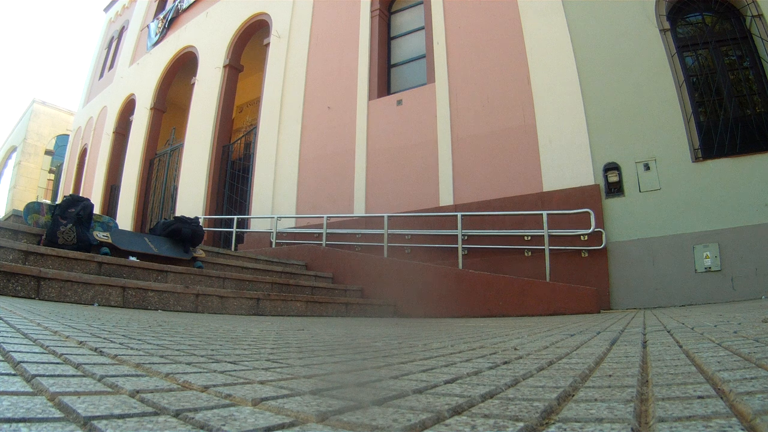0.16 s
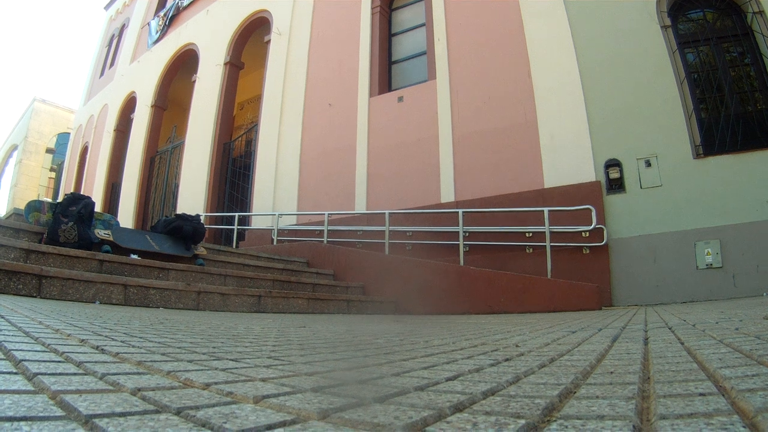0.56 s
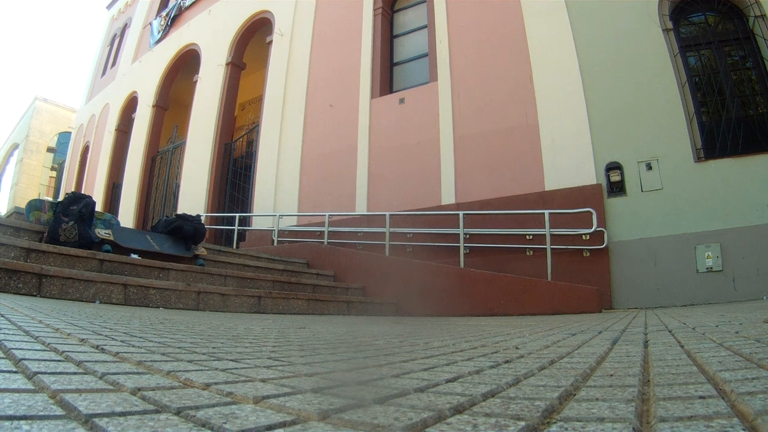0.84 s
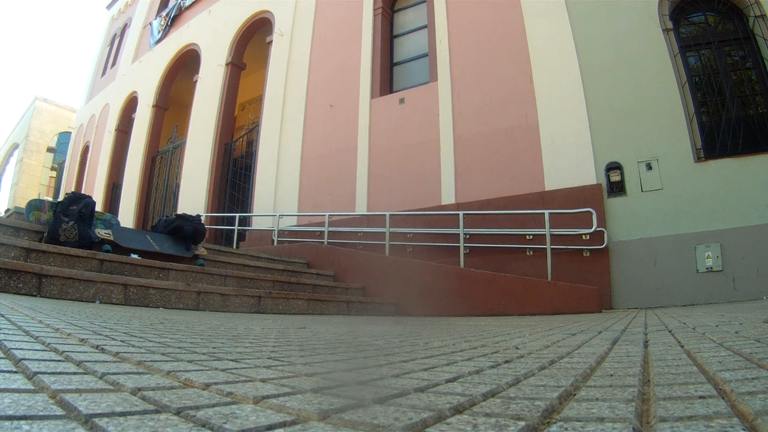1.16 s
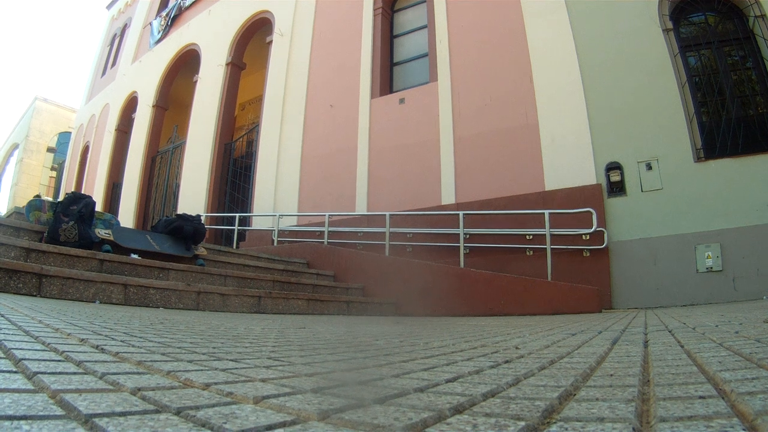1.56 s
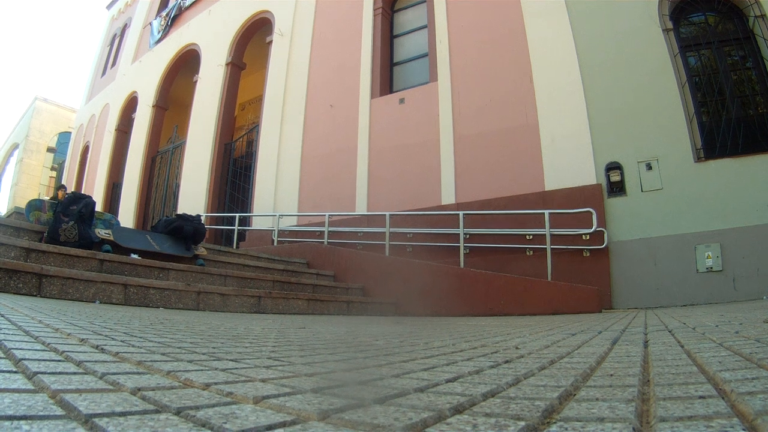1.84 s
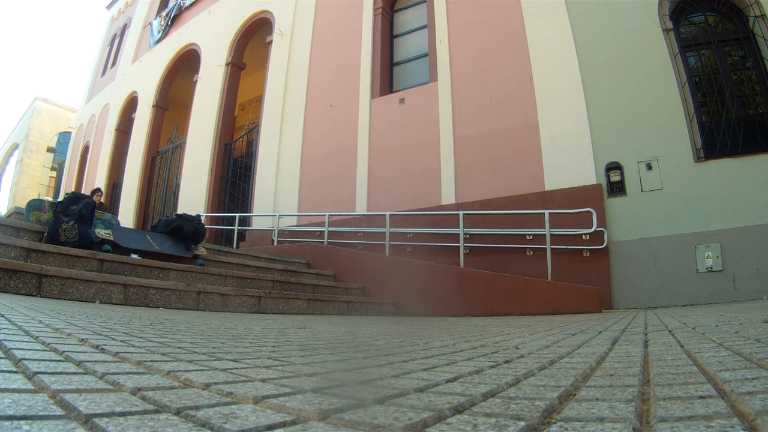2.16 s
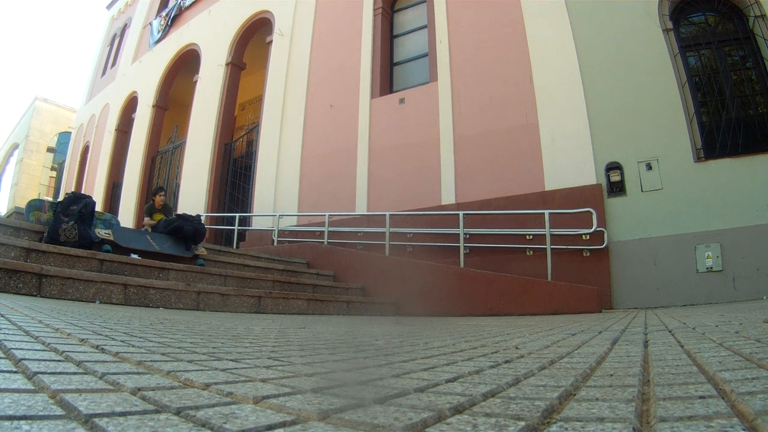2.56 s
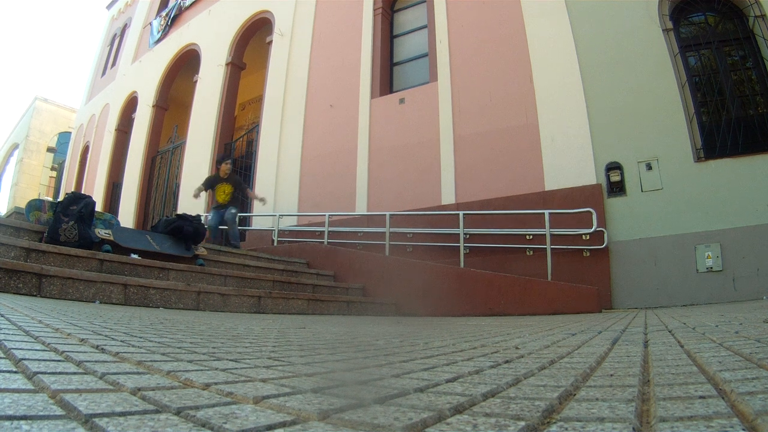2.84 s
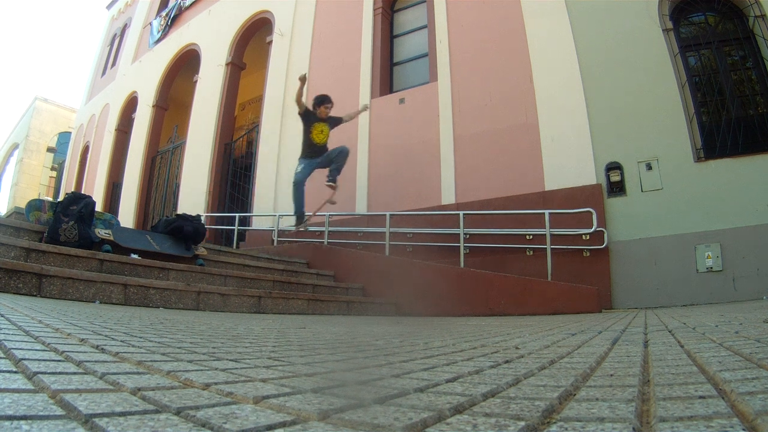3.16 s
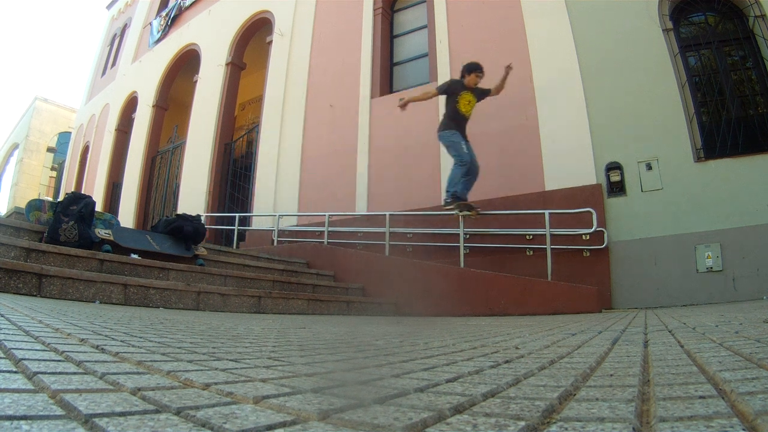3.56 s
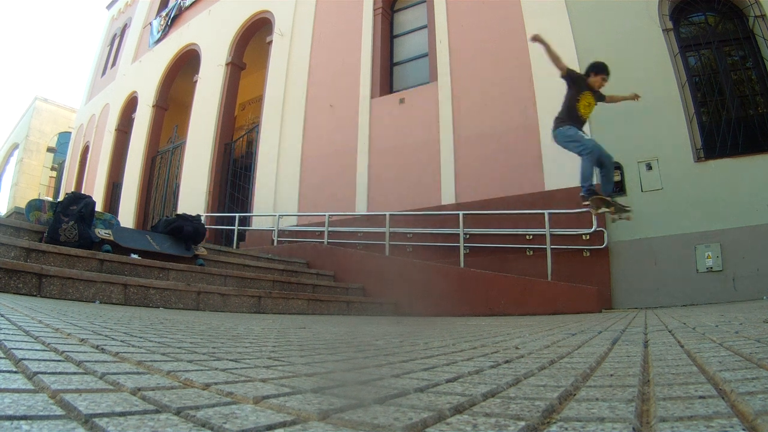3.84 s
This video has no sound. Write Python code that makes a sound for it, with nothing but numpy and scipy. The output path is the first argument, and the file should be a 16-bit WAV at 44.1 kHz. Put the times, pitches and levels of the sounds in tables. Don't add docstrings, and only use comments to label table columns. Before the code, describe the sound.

Skateboard outdoors over faint traffic wash. Loud close plastic clicks at about 0.26 and 0.32 s, then quiet. At 1.18 s the board drops with a wooden knock and short tail scrape. From 1.5 s wheels rumble and knock over paving joints, strongest near 3.1 s. A pop at 3.2 s, a clipped steel clang at 3.45 s, ringing scrape, and two taps near 3.95 s with wall echo.

```python
import sys
import numpy as np
from scipy import signal
from scipy.fft import rfft, irfft
from scipy.io import wavfile
from scipy.ndimage import uniform_filter1d

SR = 44100
rng = np.random.default_rng(int(sys.argv[2]) if len(sys.argv) > 2 else 0)


def pcm_store(signal):
    levels = np.round(np.clip(np.atleast_2d(signal), -1, 1) * 32767)
    wavfile.write(sys.argv[1], SR, levels.astype(np.int16).T)


def voltage_ratio(decibels):
    exponent = np.asarray(decibels, float) / 20
    return 10 ** exponent


N = 176400
T = np.arange(N) / SR


def evened(x):
    return x / np.sqrt(np.mean(x ** 2) + 1e-20)


def noise():
    return rng.standard_normal(N)


def read(points, hz):
    f, value = np.transpose(points)
    return np.interp(np.log(hz + 1), np.log(f + 1), value)


def coloured(x, points):
    gain = voltage_ratio(read(points, np.fft.rfftfreq(len(x), 1 / SR)))
    return evened(irfft(rfft(x) * gain, len(x)))


def resonate(x, hz, width_hz):
    return signal.lfilter(*signal.iirpeak(hz, hz / max(width_hz, .5), SR), x)


def curve(points, column=1):
    rows = np.transpose(points)
    return voltage_ratio(np.interp(T, rows[0], rows[column], -120, -120))


def lumps(size):
    return evened(uniform_filter1d(uniform_filter1d(noise(), size), size))


def pulse(u):
    return u * np.exp(1 - u)


def dying(points, t60s, start_s):
    hz, t, z = signal.stft(coloured(noise(), points), SR, nperseg=256)
    t60 = np.maximum(read(t60s, hz), .05)[:, None]
    z = z * voltage_ratio(-60 * np.maximum(t - start_s, 0) / t60)
    return signal.istft(z, SR, nperseg=256)[1][:N] * np.clip((T - start_s) / 0.009, 0, 1)


def grit(per_s, spread_db):
    hits = rng.random(N) < per_s / SR
    size = voltage_ratio(spread_db * np.minimum(rng.exponential(1, N), 4))
    return hits * size * rng.choice([-1., 1.], N)


# frequency in Hz, level in dB.
AIR_COLOUR = [(12, -40), (20, -8.5), (54, -1.5), (301, -12.5), (452, -14), (497, -12.5), (587, -16),
              (2890, -29.5), (5300, -34.5), (6000, -47), (7670, -100), (13000, -120)]


def air():
    return voltage_ratio(-35.5 + 0.54 * lumps(size=2500)) * coloured(noise(), AIR_COLOUR)


CLICK_S = [.2553, .2556, .2566, .257, .2562, .2562, .2558, .2625, .2635, .2635, .3176, .3184, .3178, .3178,
           .3176, .318, .535, .2635, .2635, .3232, .3232, .3235, .3190]
# frequency in Hz, level in dB, rise in seconds.
CLICK_PARTS = [(770, -4, 0.0007), (1450, -12, 0.00044), (3070, -16.5, 0.00073), (3730, -7.5, 0.0005),
               (2330, -14.5, 0.00086), (4600, -22, 0.0015), (5430, -17, 0.0005), (228, -18.5, 0.0017),
               (3000, -25.5, 0.00075), (4200, -22, 0.00066), (447, -8, 0.0012), (2326, 3, 0.0011),
               (3693, 2.5, 0.0013), (4630, 0, 0.00085), (1100, -2, 0.0013), (1625, -12.5, 0.0019),
               (1900, -34, 0.0015), (1900, -24, .0006), (5200, -27, .0006), (2480, -14, .0007),
               (3600, -20, .0007), (800, -15, 0.0012), (3450, -33, 0.00049)]


def clicks():
    out = np.zeros(N)
    for s, (hz, db, rise_s) in zip(CLICK_S, CLICK_PARTS):
        t = np.maximum(T - s, 0)
        out -= voltage_ratio(db) * pulse(t / rise_s) ** 2 * np.sin(2 * np.pi * hz * t)
    return out


# time in seconds, level in dB.
DRAG_LEVEL = [
    (1.2, -43),
    (1.225, -35.5),
    (1.25, -29.5),
    (1.3, -31.5),
    (1.35, -35.5),
    (1.41, -39.5),
    (1.48, -47.5),
]
# frequency in Hz, level in dB.
DRAG_COLOUR = [(120, -38), (200, -7), (269, -17), (474, 2), (1410, -7.5), (2300, -9.5), (4400, -15.5),
               (5900, -31.5), (7670, -64), (13000, -120)]


def drag():
    slips = noise() + 0.16 * evened(grit(per_s=1400, spread_db=2.7))
    return curve(DRAG_LEVEL) * voltage_ratio(2.0 * lumps(size=250)) * coloured(slips, DRAG_COLOUR)


# frequency in Hz, width in Hz, level in dB.
DECK_MODES = [(129.6, 33, -2), (178.8, 63, 2), (230, 79, 1.5), (452.6, 96, 1.5), (522.5, 75, 0),
              (609.6, 35.4, 0), (681.6, 56, -3.5), (776.6, 40, -5.5), (864, 24, -17), (1090, 86, -51)]


def deck(drive, weight, bright, sway):
    sway_db, modes = 1.5, []
    for k, (hz, width_hz, db) in enumerate(DECK_MODES):
        ring = evened(resonate(resonate(drive, hz, 1.39 * width_hz), hz, 1.38 * width_hz))
        modes.append(voltage_ratio(db + sway_db * np.roll(sway, k * N // len(DECK_MODES))) * ring)
    low, middle, top = sum(modes[:3]), sum(modes[3:7]), sum(modes[7:])
    return (middle + bright * top) / np.std(middle) + weight * evened(low)


# time in
# seconds, thud in dB, pitch in Hz, rattle in dB.
JOINTS = [(1.179, -15, 515, -37), (1.548, -10, 800, -45), (1.30, -32, 696, -34), (3.066, -15.5, 816, -49),
          (1.249, -28, 880, -32), (1.439, -20.5, 510, -57), (2.783, -9.5, 153, -57), (2.402, -10, 555, -53),
          (3.085, -6.5, 193, -38), (3.165, -18, 250, -44), (3.205, -12, 276, -28.5),
          (3.113, -12.5, 800, -52), (1.354, -13, 496, -50), (1.501, -6.5, 532, -38), (1.541, -4, 578, -40),
          (1.852, -6.5, 606, -41), (1.895, -16, 647, -51), (1.93, -8.5, 588, -46), (1.944, -6.5, 610, -56),
          (1.989, -8, 563, -59), (1.695, -14, 566, -53), (2.15, -11.5, 600, -47), (2.61, -8, 702, -53),
          (2.022, -8.5, 603, -64), (2.251, -4, 462, -52), (2.348, -10.5, 588, -35.5),
          (2.429, -8.5, 598, -52), (2.444, -7.5, 630, -36.5), (2.55, -9.5, 535, -39),
          (2.668, -19, 533, -47), (2.769, -21, 606, -33), (2.865, -12, 650, -33.5), (2.984, -7.5, 540, -35),
          (3.014, -18, 667, -38), (3.063, -12, 620, -47), (3.077, -10, 637, -36.5), (3.099, -12, 650, -44)]


def joints(rattle):
    trim_db, rise_s, rattle_s, size = -7.5, 0.0051, 0.018, 3000
    out, t = np.zeros(N), np.arange(size) / SR
    for s, thud_db, hz, rattle_db in JOINTS:
        at, u = round(s * SR), t / rise_s
        phase = 2 * np.pi * hz * t
        rock = np.sin(phase) + 0.24 * np.sin(0.408 * phase) + 0.2 * np.sin(1.45 * phase)
        shaken = np.minimum(u * 3, 1) * np.exp(-t / rattle_s) * rattle[at:at + size]
        out[at:at + size] += voltage_ratio(thud_db + trim_db) * pulse(u) ** 1.16 * rock + voltage_ratio(rattle_db) * shaken
    return out


# time in seconds, level in dB, weight of low deck modes in dB.
ROLL = [(1.49, -54, 10), (1.5, -23, -2), (1.65, -21, -9.5), (1.79, -25, -2), (1.9, -24, -5),
        (2.05, -26, -6), (2.13, -24.5, -6.5), (2.2, -24.5, -10), (2.45, -22, -4), (2.62, -21.5, -3),
        (2.78, -20.5, -3), (2.82, -22.5, -3), (3.05, -19.5, -1.5), (3.09, -16.5, -1), (3.13, -25, 1),
        (3.2, -24, 0.5), (3.24, -27, -4), (3.36, -50.5, 12)]
# frequency in Hz, level in dB.
RATTLE_COLOUR = [(530, -5.5), (900, -2), (1250, -28), (2140, -7.5), (2330, -18), (3050, -15), (5900, -23),
                 (7670, -67), (13000, -120)]


def rolling():
    smooth_share, lump_db = .62, 1.2
    lump = lumps(size=350)
    sway = evened(uniform_filter1d(lump, size=1500))
    bumps = evened(grit(per_s=900, spread_db=1.6))
    drive = ((1 - smooth_share) * bumps + smooth_share * noise()) * voltage_ratio(lump_db * lump)
    level = curve(ROLL)
    bright = np.minimum(level / voltage_ratio(-17.5), 2) ** 0.83
    wood = deck(drive, curve(ROLL, column=2), bright, sway)
    rattle = coloured(noise(), RATTLE_COLOUR)
    return level * (wood + voltage_ratio(-22 + 2.0 * lumps(size=300)) * rattle) + joints(rattle)


KNOCK_S = [1.1795, 3.216, 3.9533, 3.96]
# level in dB, burst in seconds, echo in dB.
KNOCKS = [
    (-23, 0.027, -18),
    (-16.5, 0.016, -12),
    (-16.5, 0.0059, -7.5),
    (-18.5, 0.0073, -19),
]
# frequency in Hz, level in dB.
KNOCK_COLOURS = [
    [(88, -46), (150, -29), (545, 1), (1270, -12.5), (1920, -12), (2240, -12.5), (4690, -22.5), (5900, -35),
     (7670, -70), (13000, -120)],
    [(88, -31), (150, -17), (482, -8), (741, -1), (1310, -11), (3500, -15.5), (4760, -17.5), (5900, -31),
     (7670, -66), (13000, -120)],
    [(88, -24), (150, 8.5), (1530, -1.5), (1920, 1), (2210, -0.5), (2650, -5), (4830, -8.5), (5900, -33),
     (7670, -69), (13000, -120)],
]
# frequency in Hz, t60 in seconds.
ECHO_T60 = [(200, 1), (1000, 0.68), (3000, .55), (5500, 0.39)]


def knocks():
    out, echo_lag_s = np.zeros(N), 0.024
    for s, (db, burst_s, echo_db), colour in zip(KNOCK_S, KNOCKS, KNOCK_COLOURS + KNOCK_COLOURS[-1:]):
        u = np.maximum(T - s, 0) / burst_s
        chatter = coloured(noise() + 0.5 * evened(grit(per_s=3700, spread_db=7.1)), colour)
        burst = np.minimum(u * 10, 1) * np.exp(-u ** 2.5) * chatter
        bounce = 0.21 * np.roll(burst, 60)
        swell = np.clip((T - s) / echo_lag_s, .35, 1)
        out += voltage_ratio(db) * (burst + bounce + voltage_ratio(echo_db) * swell * dying(colour, ECHO_T60, s))
    return out


# lag in seconds, frequency in Hz, level in dB, rise in seconds.
SLAM = [(.0012, 470, -5, 0.0022), (.0012, 770, -7, 0.0022), (0.00356, 910, -13.5, 0.0029),
        (0.00295, 1330, -23, .0015), (.001, 3085, -13, 0.0018), (0.00053, 3600, -13, .0016),
        (0.001, 4700, -13, 0.0017), (.0007, 5200, -14.5, .0017), (0.0072, 1600, -5, .0015),
        (0.00083, 2440, -13.5, 0.0013)]


def slam(t):
    out = np.zeros(N)
    for lag_s, hz, db, rise_s in SLAM:
        since = np.maximum(t - lag_s, 0)
        out += voltage_ratio(db) * pulse(since / rise_s) ** 2 * np.sin(2 * np.pi * hz * since)
    return out


RAIL_HZ = [114, 198, 226, 842, 987, 2104, 2780, 2825, 2947, 3122, 3408, 3770, 4100, 1351]
# level in dB, t60 in seconds.
RAIL_MODES = [(-3, 6.1), (-10, 2.8), (-2, 1.2), (-3.5, 1.3), (-5, 0.6), (-10, 1.1), (-19.5, 2.2),
              (-18, 2.1), (-3, 0.43), (-7, 0.4), (-24, 0.41), (-8.5, 0.6), (-1.5, 0.4), (-4, 0.7)]
# frequency in Hz, width in Hz, level in dB, t60 in seconds.
SHIMMER = [(2840, 260, -33, 0.97), (3130, 240, -33, 0.35), (3440, 180, -29, 0.34), (4100, 250, -35, .4)]


def rail_modes(t):
    waver_db, waver_hz, ring_db, sing_db = 4.0, 9, -28, -26.5
    shake, out = noise() * voltage_ratio(0.64 * lumps(size=300)), np.zeros(N)
    for hz, (db, t60) in zip(RAIL_HZ, RAIL_MODES):
        sing = evened(resonate(shake, hz, 22 + 0.006 * hz))
        cycles = hz * t + waver_hz * np.cumsum(lumps(size=700)) / SR + rng.random()
        ring = voltage_ratio(waver_db * lumps(size=900)) * np.sin(2 * np.pi * cycles)
        out += voltage_ratio(db - 60 * t / t60) * (voltage_ratio(ring_db) * ring + voltage_ratio(sing_db) * sing)
    for hz, width_hz, db, t60 in SHIMMER:
        out += voltage_ratio(db - 60 * t / t60) * evened(resonate(resonate(shake, hz, width_hz), hz, width_hz))
    return out


# frequency in Hz, level in dB.
CRACK_COLOUR = [(88, -45), (150, -38), (545, 1), (1160, -5), (2690, -14), (3090, -11), (5300, -11),
                (5900, -53), (7670, -69), (13000, -120)]
# frequency in Hz, level in dB.
SLIDE_COLOUR = [(35, -56), (60, -29), (113, -19), (230, -57), (394, -10), (817, -12), (1860, -18.5),
                (2650, -18), (4300, -14), (5900, -23.5), (7670, -71), (13000, -120)]
# frequency in Hz, t60 in seconds.
SLIDE_T60 = [(100, 0.72), (500, 2.5), (1500, 0.82), (3000, 0.97), (5500, 0.2)]


def rail():
    clang_s, crack_s, crack_db, slide_db = 3.4497, .011, -13, -22
    t = np.maximum(T - clang_s, 0)
    blow = np.minimum(t / 0.0011, 1)
    crack = voltage_ratio(crack_db) * np.exp(-t / crack_s) * coloured(noise(), CRACK_COLOUR)
    scrape = voltage_ratio(slide_db + 0.62 * lumps(size=200)) * dying(SLIDE_COLOUR, SLIDE_T60, clang_s)
    return slam(t) + blow * (crack + rail_modes(t)) + scrape


def scene():
    return (air() + clicks() + drag() + rolling() + knocks() + rail())[None]


# frequency in Hz, width in Hz, level in dB.
CASE = [(3014, 390, 3), (2320, 118, -5.5)]


def case(x):
    return x + sum(voltage_ratio(db) * resonate(x, hz, width_hz) for hz, width_hz, db in CASE)


def overload(x):
    duck_db, duck_s = -10, 0.013
    loud = signal.lfilter([1], [1, -np.exp(-1 / (duck_s * SR))], np.abs(x) > 1.1)
    amount = np.minimum(np.roll(loud, 130) / 8, 1)
    return x * voltage_ratio(duck_db * uniform_filter1d(amount, 100))


def sample_and_hold(x):
    slow_hz, hold, clip, edge_hz = 12000, 4, 1.15, 15300
    slow = np.clip(signal.resample(x, N * slow_hz // SR), -clip, clip)
    held = signal.resample(np.repeat(slow, hold), N)
    held = held * np.clip((T - .0693) / 0.0014, 0, 1)
    band = signal.firwin(511, edge_hz, window=("kaiser", 8), fs=SR)
    return signal.oaconvolve(held, band, "same")


def band_limit(x):
    return signal.sosfilt(signal.butter(12, 15900, fs=SR, output="sos"), x)


def record(dry):
    x = signal.sosfilt(signal.butter(8, 5500, fs=SR, output="sos"), case(dry[0]))
    held = sample_and_hold(overload(x))
    return band_limit(np.clip(held, -1, 1)[None])


dry = scene()
out = record(dry)
pcm_store(out)
```